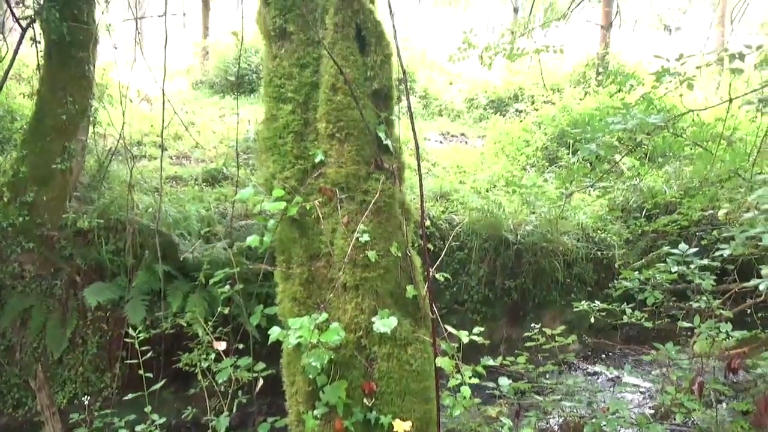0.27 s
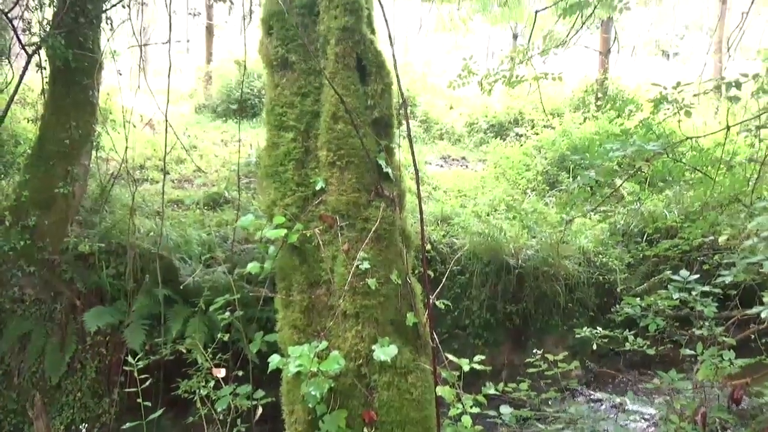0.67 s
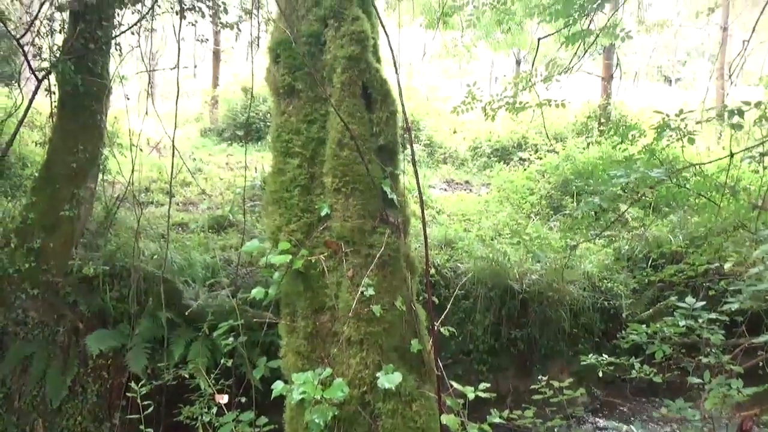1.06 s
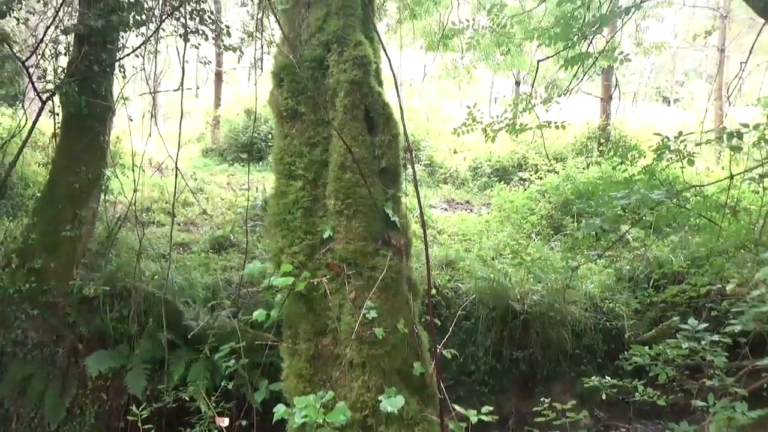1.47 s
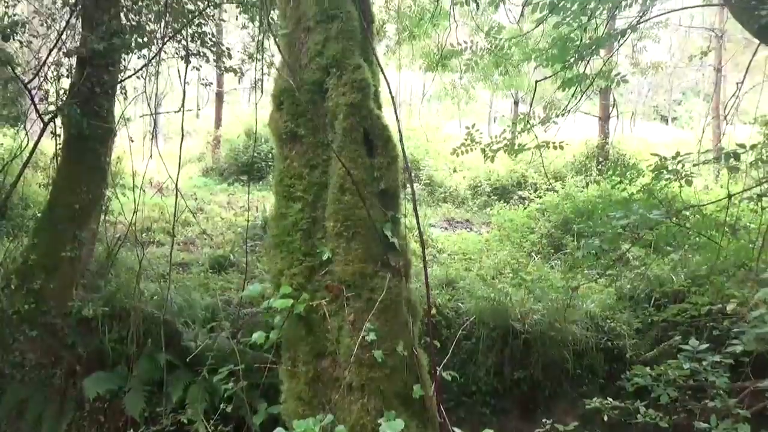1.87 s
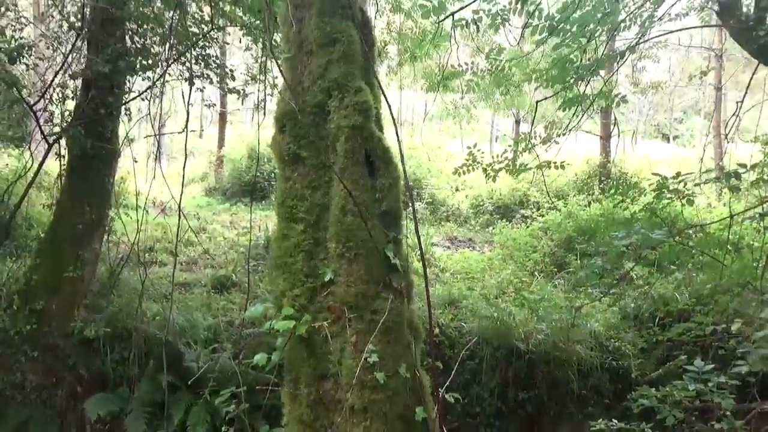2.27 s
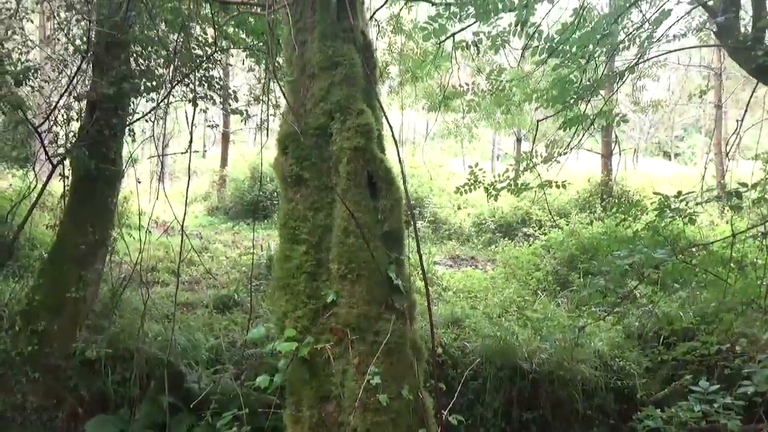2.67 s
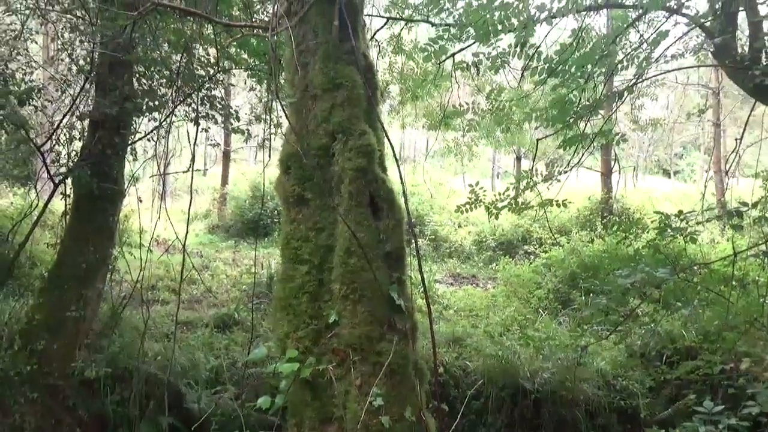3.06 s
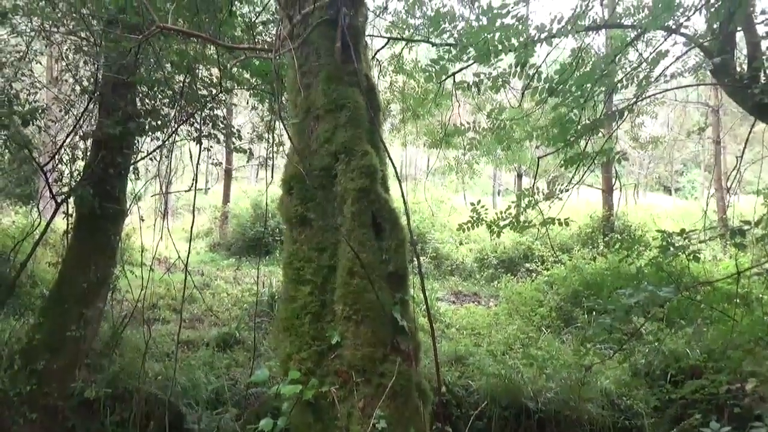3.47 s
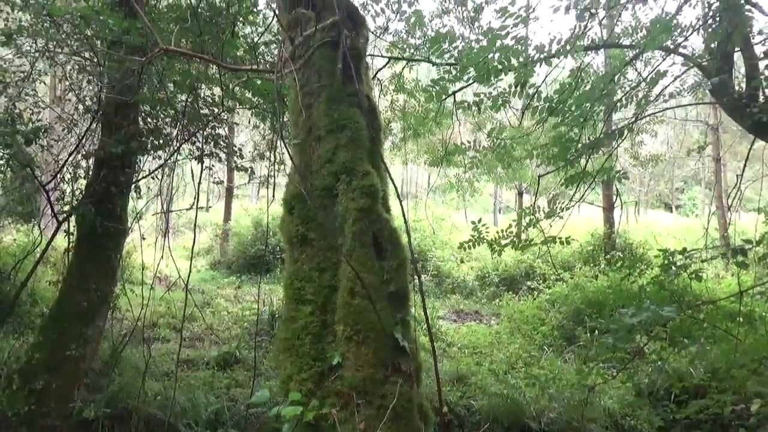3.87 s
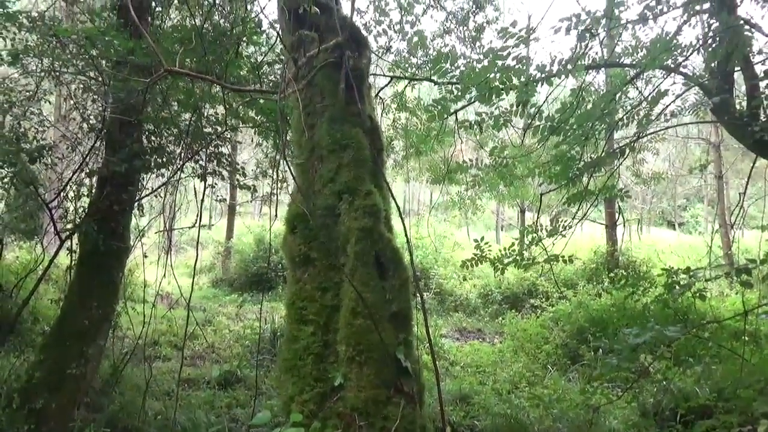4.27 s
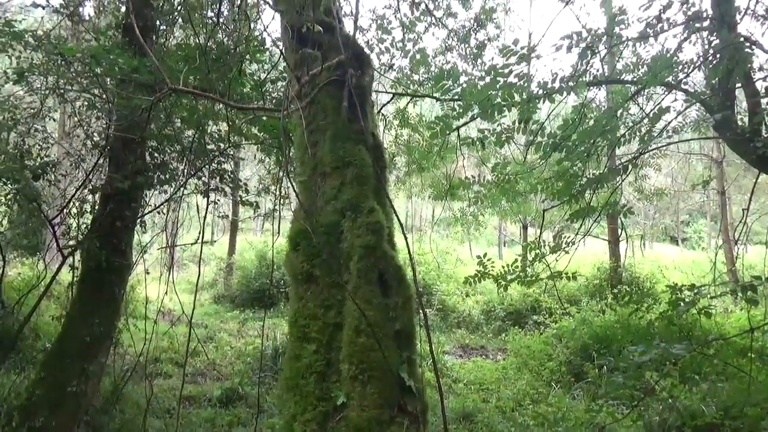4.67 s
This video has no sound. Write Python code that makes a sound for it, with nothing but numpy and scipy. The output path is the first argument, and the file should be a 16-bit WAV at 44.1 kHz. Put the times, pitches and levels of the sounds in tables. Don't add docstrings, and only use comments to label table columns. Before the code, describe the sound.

A dull handling knock opens, then a shallow stream runs continuously over stones: a bright, even wash filled with small bubbles, hollow glugs, rising plinks and crisp drop ticks. Thin high birds chirp faintly among the trees, mostly in the first two seconds. A very low distant engine hums underneath. The handheld stereo microphone is near the water, with a few faint finger touches.

```python
import sys
import numpy as np
from scipy import signal
from scipy.io import wavfile
from scipy.ndimage import uniform_filter1d

SR = 44100
rng = np.random.default_rng(int(sys.argv[2]) if len(sys.argv) > 2 else 0)


def gain_from_db(level_db):
    decades = np.asarray(level_db, float) / 20
    return 10 ** decades


def pcm_store(signal):
    levels = np.round(np.clip(np.atleast_2d(signal), -1, 1) * 32767)
    wavfile.write(sys.argv[1], SR, levels.astype(np.int16).T)


N = 212948

# (time [s], peak level [dB], pitch [Hz])
NEAR_DROPS = [(0.1505, -25, 8740), (0.4633, -28, 7250), (1.019, -25, 7700), (1.2216, -27, 7250),
              (1.2994, -22.5, 6700), (3.9439, -26, 9700), (1.434, -28, 7700), (1.976, -25, 7000),
              (2.127, -21, 8000), (2.162, -21, 8140), (2.3283, -25, 7010), (2.351, -25, 8170),
              (2.4195, -26, 7260), (2.5124, -23, 8600), (2.5701, -27, 7900), (2.6256, -25, 7200),
              (3.051, -27, 8220), (3.1232, -20, 8700), (3.1453, -22, 10000), (3.332, -23, 7300),
              (3.673, -23.5, 10700), (3.737, -19, 9600), (3.863, -20.5, 10100), (4.155, -25, 9000),
              (4.186, -19, 10700), (4.2677, -23, 7200), (4.6028, -23, 7800), (4.7045, -29, 7400),
              (4.7361, -23, 9400), (4.775, -24, 9040)]


def rms_one(x):
    return x / np.sqrt(np.mean(x ** 2) + 1e-20)


def in_time(rows):
    s, *columns = np.transpose(rows)
    return [np.interp(np.arange(N) / SR, s, column) for column in columns]


def at_hz(points, hz):
    point_hz, value = np.transpose(points)
    return np.interp(np.log(hz), np.log(point_hz), value)


def drift(rate_hz):
    pole = np.exp(-80 * np.pi * rate_hz / SR)
    noise = rng.standard_normal(N // 40 + 2002)
    slow = signal.lfilter([1], [1, -2 * pole, pole * pole], noise)[2000:]
    return np.interp(np.arange(N) / 40, np.arange(len(slow)), rms_one(slow))


def place(shapes, s, pan_db):
    starts = np.round(s * SR).astype(int)
    at = (starts[:, None] + np.arange(shapes.shape[1])).ravel()
    sides = []
    for sign in (1, -1):
        panned = shapes * gain_from_db(sign * pan_db / 2)[:, None]
        sides.append(np.bincount(at, panned.ravel(), N)[:N])
    return np.array(sides)


def pings(s, db, hz, t60, rise, pan_db, size=2000, swell_cycles=4.2):
    t = np.arange(size) / SR
    db, hz, t60, rise = [v[:, None] for v in (db, hz, t60, rise)]
    swell = 1 - np.exp(-t * hz / swell_cycles)
    phase = 2 * np.pi * hz * (t + rise * t ** 2 / (2 * t60))
    fade = np.clip((size / SR - t) * 200, 0, 1)
    return place(gain_from_db(db - 60 * t / t60) * swell * fade * np.sin(phase), s, pan_db)


def scatter(x, t60, build_s, spread):
    t = np.arange(20000) / SR
    shared, left, right = rng.standard_normal((3, len(t)))
    envelope = gain_from_db(-60 * t / t60) * (1 - np.exp(-t / build_s))
    tail = (shared + spread * np.array([left, right])) * envelope
    tail /= np.sqrt(np.mean(np.sum(tail ** 2, axis=1)))
    return signal.fftconvolve(x[None], tail, axes=1)[:, :N]


def engine():
    # (time [s], pitch [Hz], level [dB rms])
    drone = [(0.0, 59.5, -67.5), (0.6, 57.1, -71), (2.45, 59.9, -60.5), (2.94, 63.4, -62.5),
             (4.42, 65, -61.5), (4.83, 62, -63.5)]
    hz, db = in_time(drone)
    phase = 2 * np.pi * np.cumsum(hz + 0.59 * drift(3.0)) / SR
    lag = 0.15 * drift(6.7) * np.array([[1], [-1]])
    return gain_from_db(db + 4.0 + 1.2 * drift(2.5)) * np.sin(phase + lag)


def glides(rows, waver_size, flutter_db):
    out = np.zeros(N)
    for s, length_s, first_hz, last_hz, db, waver_hz in rows:
        u = np.arange(int(length_s * SR)) / (length_s * SR)
        slow = uniform_filter1d(rng.standard_normal((2, 6000)), size=waver_size)
        waver, flutter = rms_one(slow)[:, :len(u)]
        hz = first_hz + (last_hz - first_hz) * u + waver_hz * waver
        shape = gain_from_db(flutter_db * flutter) * np.sin(np.pi * u) ** .5
        note = gain_from_db(db + 2.5) * rms_one(shape) * np.sin(2 * np.pi * np.cumsum(hz) / SR)
        out[int(s * SR):][:len(u)] += note
    return out


def birds():
    # (time [s], length [s], first pitch [Hz], last pitch [Hz], level [dB rms])
    seeps = [(0.179, 0.023, 8250, 7580, -47.5), (0.342, 0.04, 7000, 7670, -50),
             (0.738, 0.034, 6450, 7630, -50), (0.767, 0.03, 8500, 8600, -45),
             (0.799, .045, 8650, 8400, -47), (.835, 0.061, 8270, 8000, -45), (1.664, .015, 7300, 7900, -49),
             (1.703, 0.016, 8200, 7600, -50), (1.779, 0.025, 6800, 6120, -43),
             (1.944, 0.015, 6500, 5970, -48), (2.418, 0.02, 7300, 7100, -51),
             (4.267, 0.028, 7100, 7300, -50), (1.575, 0.018, 7000, 7300, -50),
             (1.425, 0.016, 7600, 6530, -52), (4.455, 0.015, 6300, 6700, -52)]
    # (time [s], length [s], first pitch [Hz], last pitch [Hz], level [dB rms])
    whistles = [(0.025, 0.02, 6400, 7500, -45.5), (0.04, 0.025, 7480, 7400, -48),
                (0.243, 0.044, 6180, 6460, -49.5), (0.307, 0.062, 6250, 6400, -53),
                (0.595, 0.021, 6280, 6410, -44.5), (.765, 0.039, 7300, 7500, -48),
                (0.911, 0.023, 8150, 8100, -48), (0.96, .015, 8100, 8050, -51), (.72, .04, 6200, 6300, -58),
                (0.983, 0.018, 7300, 7030, -45), (1.178, 0.042, 6940, 7120, -45),
                (1.385, 0.042, 7900, 8220, -52), (2.774, 0.038, 9200, 8500, -52),
                (2.83, 0.038, 8600, 8600, -46.5), (2.92, .05, 8450, 8450, -55),
                (2.92, .045, 7750, 7650, -55), (2.82, 0.07, 8200, 8050, -50),
                (2.881, 0.034, 8030, 7820, -49), (3.861, .09, 6830, 6560, -57),
                (3.996, 0.042, 6900, 6530, -56), (4.045, 0.085, 6530, 6450, -52)]
    # (time [s], length [s], pitch [Hz], level [dB rms])
    chips = [(.075, 0.015, 4780, -52), (1.041, 0.028, 5600, -53), (1.86, 0.019, 4620, -51),
             (1.976, .03, 5030, -56), (2.345, 0.022, 4820, -52), (3.984, .015, 6100, -54),
             (4.255, .03, 5500, -59), (4.288, 0.034, 5550, -47), (4.355, .022, 5130, -57),
             (4.295, 0.03, 4620, -59), (4.318, 0.016, 5140, -47), (4.365, 0.03, 5540, -57)]
    seep_waver_hz, whistle_waver_hz, chip_waver_hz, chip_sag_hz = 250, 70, 35, 40
    wood_t60_s = 0.56

    high = [(*note, seep_waver_hz) for note in seeps]
    high += [(*note, whistle_waver_hz) for note in whistles]
    low = [(s, length_s, hz, hz - chip_sag_hz, db, chip_waver_hz) for s, length_s, hz, db in chips]
    voice = glides(high, waver_size=70, flutter_db=4.5) + glides(low, waver_size=120, flutter_db=3.0)
    return gain_from_db(4.5) * voice + gain_from_db(2.0) * scatter(voice, wood_t60_s, build_s=0.0033, spread=0.28)


def bumps():
    # (time [s], peak level [dB], pitch [Hz], t60 [s])
    knocks = [
        (0.043, -28.5, 250, 0.033),
        (.805, -42, 242, 0.033),
        (1.289, -39.5, 273, 0.031),
        (.27, -45, 287, .04),
        (4.3, -45, 326, 0.063),
    ]
    s, db, hz, t60 = np.transpose(knocks)
    return pings(s, db + 8.5, hz, t60, 0 * s, 0 * s, size=3000, swell_cycles=0.84)


def wash(babble_db, spray_db):
    # (frequency [Hz], density [dB per Hz])
    wash_spectrum = [(20, -23), (40, -9), (107, -4), (280, -0.5), (430, -9.5), (620, -4.5), (1230, -1.5),
                     (2050, -1.5), (3320, -6.5), (5120, -7.5), (6500, -7), (8000, 1), (10200, -5.5),
                     (14000, -7)]
    # (frequency [Hz], left-right likeness [0-1])
    likeness = [(60, 1), (140, 1), (350, 0.77), (830, 0.92), (2000, 1), (4800, 0.92), (11500, 0.9)]
    surge_sizes_db = [(150, 0.062), (1000, 1.8), (8000, 1.6)]

    out, together = 0, drift(7)
    band_hz = 25 * 2 ** np.arange(0, 9.3, .4)
    white = rng.standard_normal((2, 2, N))
    for k, (low, high) in enumerate(zip(band_hz, band_hz[1:])):
        band = signal.butter(2, [low, high], "band", fs=SR, output="sos")
        mid, side = signal.sosfilt(band, white[k % 2])
        hz = np.sqrt(low * high)
        alike = np.clip(at_hz(likeness, hz) - .03, 0, .995)
        surge_db = at_hz(surge_sizes_db, hz) * (0.29 * together + drift(24.3))
        follows = np.interp(np.log(hz / 1000), [-1.2, -.7], [0, 1])
        flow_db = follows * (babble_db if hz < 4500 else spray_db)
        stereo = np.sqrt(1 + alike) * mid + np.sqrt(1 - alike) * side * [[1], [-1]]
        out = out + gain_from_db(at_hz(wash_spectrum, hz) + surge_db + flow_db) * stereo
    return gain_from_db(-40) * rms_one(out)


def spray(flow_db):
    # (time [s], half length [s], lift [dB])
    slops = [(.15, .05, 1.5), (0.582, .03, 9), (.78, .03, 1), (1.365, .02, 4.5), (1.55, 0.034, 5),
             (2.1, 0.33, 2.5), (2.63, .03, 1.5), (2.9, .015, 3), (3.12, .03, 2), (3.22, .015, 1),
             (3.33, .04, 2), (3.87, 0.028, 4), (4.17, 0.025, 2), (4.306, 0.032, 7), (4.763, .04, 2.5)]
    follows_flow, gust_db, gusts_hz = .3, 0.5, 12.0
    splash_db, splash_s = 1, 0.017

    t = np.arange(0, N, 40) / SR
    drop_s = np.array(NEAR_DROPS)[:, :1]
    s, half_s, lift_db = np.transpose(slops)[:, :, None]
    splash = splash_db * np.exp(-((t - drop_s) / splash_s) ** 2).max(axis=0)
    splash = splash + (lift_db * np.exp(-((t - s) / half_s) ** 2)).sum(axis=0)
    gusts = gust_db * drift(gusts_hz)
    total_db = follows_flow * flow_db + gusts + np.interp(np.arange(N) / SR, t, splash)
    return total_db - total_db.mean()


def spits(s, db, hz, t60, pan_db, count=4):
    late, spread = rng.random((2, len(s), count)) * (np.arange(count) > 0)
    s = s[:, None] + .005 * late
    hz = hz[:, None] * (1 + 0.3 * spread * (-1) ** np.arange(count))
    late = late.ravel()
    db, t60, pan_db = [np.repeat(v, count) for v in (db, t60, pan_db)]
    db = db - 6 * late - 4 * (late > 0)
    return pings(s.ravel(), db + 5, hz.ravel(), t60, 0 * db, pan_db, size=400, swell_cycles=0.56)


def ticks():
    # (time [s], peak level [dB], pitch [Hz])
    spray_ticks = [(0.2508, -28, 7110), (0.5267, -27, 7560), (0.5686, -28, 10300), (0.602, -25, 6440),
                   (0.7662, -23, 7410), (0.7871, -23, 8080), (0.8949, -23, 8140), (0.9622, -25, 8080),
                   (1.0114, -26, 7760), (1.1179, -27, 7780), (1.1662, -27, 6940), (1.2675, -23, 7080),
                   (1.3588, -27, 9230), (1.3714, -27, 9900), (1.3814, -27, 8060), (1.5224, -31, 7510),
                   (1.5424, -29, 9130), (1.5574, -25, 10500), (1.5724, -29, 7000), (1.5934, -27, 7100),
                   (1.8123, -25, 6340), (1.9374, -26, 5990), (2.0028, -29, 7450), (2.0462, -26, 7830),
                   (2.3256, -29, 10200), (2.4962, -27, 7810), (2.6544, -31, 9360), (2.7317, -27, 9600),
                   (2.7611, -32, 9810), (2.8174, -24, 8130), (2.8928, -26, 7840), (2.9594, -31, 9520),
                   (3.3004, -29, 7540), (3.8734, -28, 6480), (4.0218, -31, 6740), (4.0574, -30, 6470),
                   (4.1121, -28, 6890), (4.1754, -25, 10300), (4.2124, -32, 8280), (4.3954, -26, 8770),
                   (4.4984, -27, 10700), (4.6912, -31, 8050)]
    # (time [s], peak level [dB], pitch [Hz])
    pips = [(0.0757, -36, 2780), (0.1173, -36, 2370), (0.1444, -30.5, 3030), (0.213, -33, 2820),
            (0.3242, -32, 3170), (0.5272, -31, 2680), (0.6085, -36, 3140), (0.622, -34, 2780),
            (0.6664, -36, 2720), (0.7462, -35, 2460), (0.8894, -36, 2990), (0.9093, -35, 3800),
            (1.0497, -34, 3710), (1.074, -30.5, 2760), (1.2575, -36, 3590), (1.283, -31, 3380),
            (1.3099, -37, 2470), (1.4012, -36, 2510), (1.4965, -31, 2270), (1.701, -33, 2540),
            (1.8692, -34, 2330), (2.1056, -35, 2570), (2.3131, -32, 4060), (2.4713, -36, 2770),
            (2.6244, -32, 3720), (2.6534, -36, 2380), (2.6873, -36, 2370), (2.7197, -36, 2430),
            (2.738, -33, 2450), (2.8055, -35, 2920), (2.8968, -35, 2590), (2.9677, -37, 3350),
            (2.9926, -34, 3170), (3.0594, -39, 2480), (3.1128, -35, 3820), (3.1288, -34, 2300),
            (3.2131, -34, 3750), (3.2979, -30, 2780), (3.3682, -35, 2280), (3.3977, -38, 2530),
            (3.5952, -36, 2360), (3.702, -36, 2910), (3.8676, -38, 2300), (3.8676, -32, 2770),
            (3.903, -38, 2360), (3.9549, -39, 2660), (4.1111, -33, 2700), (4.1834, -34, 3430),
            (4.3206, -37, 2450), (4.3395, -37, 2340), (4.3884, -31.5, 3800), (4.4458, -35, 2810),
            (4.4852, -35, 3400), (4.5201, -32, 3850), (4.6653, -34, 2340), (4.7027, -34, 2300)]
    s, db, hz = np.transpose(spray_ticks)
    out = spits(s, db - 4, hz, 22 / hz, 0 * s, count=3)
    s, db, hz = np.transpose(pips)
    climb, side = rng.random((len(s), 2)).T
    pan_db = 5 * (side - .5)
    return out + pings(s - .001, db, hz, 55 / hz, .12 * climb, pan_db, size=1200, swell_cycles=1.5)


def droplets(spray_db, count=900):
    # (frequency [Hz], gain [dB])
    mic_colour = [(3000, -14), (5200, -1), (7000, 1), (11000, 9.5)]
    s, pitch, life, side, size = rng.random((count, 5)).T
    hz = 3000 * 3.9 ** (pitch ** .5)
    db = -43 - 2.2 * np.log(size + 0.15) + at_hz(mic_colour, hz)
    db = db + 0.5 * spray_db[(s * N).astype(int)]
    far = spits(s * N / SR, db, hz, (12 + 40 * life) / hz, 8 * (side - .5))

    s, db, hz = np.transpose(NEAR_DROPS)
    near = spits(s, db - 5.5, hz, 32 / hz, 0 * s)
    slap = pings(s, db - 11, hz / 3.6, 25 / hz, 0 * s, 0 * s, size=400, swell_cycles=0.5)
    return far + near + slap


def babble(babble_db, count=4700):
    # (pitch [Hz], level [dB])
    bubble_levels = [(250, -19.5), (560, -12), (1200, -2), (2200, 0), (4500, -1.5)]
    s, pitch, life, climb, side, size = rng.random((count, 6)).T
    hz = 300 * 15 ** pitch
    db = -40.3 + at_hz(bubble_levels, hz) - 1.5 * np.log(size + 0.12)
    db = db + 2.3 * babble_db[(s * N).astype(int)]
    t60 = (14 + 55 * life ** 2) / hz
    return pings(s * N / SR, db, hz, t60, 0.31 * climb, 9 * (side - .5), size=1200, swell_cycles=0.58)


def gurgles(count=7):
    # (time [s], length [s], first pitch [Hz], last pitch [Hz], level [dB])
    pockets = [(.0, 0.025, 776, 800, -41.5), (0.8, .025, 1460, 1500, -41), (5, .04, 1260, 1210, -43.5),
               (1.06, 0.068, 1130, 776, -44), (0.76, 0.05, 800, 860, -47), (.915, .06, 1500, 900, -43),
               (1.7, 0.035, 2010, 1170, -41), (1, 0.048, 1074, 840, -43.5), (2.607, 0.088, 1290, 1260, -48),
               (0.8, 0.075, 1610, 1700, -41), (0.8, 0.05, 870, 1080, -50), (4.025, .025, 1330, 1500, -41),
               (.60, .05, 1750, 1480, -46), (2.5, 0.048, 2050, 2690, -42), (3, .11, 810, 900, -48),
               (3.5, .04, 540, 580, -49), (2.5, .04, 950, 820, -51), (3.5, 0.062, 560, 573, -57),
               (1.9, .05, 526, 640, -51), (2, .04, 600, 830, -47), (1.78, .025, 1400, 1490, -43.5),
               (3.5, .1, 1500, 1900, -42), (3.5, 0.057, 1320, 1590, -39), (4, 0.074, 1530, 2220, -40.5),
               (4, 0.038, 1790, 2550, -43)]
    s, length_s, first_hz, last_hz, db = np.transpose(pockets)[:, :, None]
    jitter, detune, size, climb = rng.random((len(s), 4, count)).transpose(1, 0, 2)
    u = (np.arange(count) + jitter) / count
    hz = (first_hz + (last_hz - first_hz) * u) * (1 + 0.082 * (detune - .5))
    hz = hz.ravel()
    db = (db + 1.5 + 6 * (size - .5)).ravel()
    s = (s + length_s * u).ravel()
    return pings(s, db, hz, 60 / hz, 0.13 * climb.ravel(), 0 * hz, swell_cycles=0.39)


def glugs():
    # (time [s], peak level [dB], pitch [Hz])
    single_bubbles = [(0.21, -21, 1210), (0.274, -28, 1030), (0.712, -24, 1056), (0.746, -23, 800), (0.787, -29, 900),
                      (0.916, -24, 1270), (0.947, -26, 996), (1.116, -33, 905), (1.257, -35, 875), (1.316, -24, 1057),
                      (1.699, -23, 1275), (2.002, -29, 1220), (2.042, -27, 1130), (2.336, -29, 1226),
                      (2.375, -26, 1030), (2.439, -29, 1170), (2.674, -27, 1070), (2.982, -23, 1007),
                      (3.128, -26.5, 887), (3.277, -26, 1250), (3.298, -26, 980), (3.344, -27, 890),
                      (3.398, -27, 1240), (3.884, -19, 1256), (4.101, -24.5, 1120), (4.244, -31, 1197),
                      (4.319, -30, 1216), (4.341, -24, 1180), (4.617, -25, 970), (4.779, -23, 1007),
                      (0.405, -22.5, 1470), (0.581, -24, 2020), (0.609, -26, 1670), (0.68, -19, 1544),
              (1.05, -22, 1834), (.64, -27, 1480), (1.497, -23, 2420), (1.635, -34, 1310),
              (1.748, -29, 1960), (1.862, -25, 1355), (1.944, -23, 1566), (2.182, -30, 1950),
              (2.229, -32, 2110), (2.358, -25.5, 1815), (2.59, -27, 2220), (2.653, -24, 1360),
              (2.72, -25, 1450), (2.738, -32, 2460), (2.893, -26, 1480), (2.967, -31, 3260),
              (3.094, -27, 1394), (3.246, -27, 1910), (3.32, -28, 1890), (3.368, -28, 2254),
              (3.595, -25, 2090), (3.792, -31, 1410), (3.834, -24, 2120), (3.86, -28, 2110),
              (4.024, -24, 1340), (4.526, -32, 1510),
                      (0.04, -23.5, 576), (0.086, -31, 483), (0.32, -40, 706), (0.74, -27, 775), (0.874, -32, 558),
              (1.074, -29.5, 680), (1.216, -33, 570), (1.265, -32, 566), (1.609, -34, 720),
              (2.132, -26.5, 542), (2.374, -33, 790), (2.842, -39, 570), (2.956, -31.5, 513),
              (3.441, -36, 894), (3.638, -28, 814), (3.736, -37, 776), (3.707, -26, 1286),
              (3.954, -30, 820), (.33, -28, 1640), (.795, -28, 1800), (3.042, -30, 1740), (2.62, -27, 1250),
              (3.365, -29, 1150), (1.525, -27, 1110), (1.915, -34, 900), (2.012, -30, 884),
              (4.109, -34, 847), (4.179, -30.5, 530), (4.465, -31.5, 780)]
    # (time [s], peak level [dB], pitch [Hz])
    trickle = [(0.1166, -36, 2380), (0.2304, -32, 1940), (1.4606, -36, 2200), (1.6511, -37, 1990),
               (1.9121, -33, 1540), (1.9864, -36, 1640), (2.3271, -35, 2100), (2.4394, -35, 2030),
               (2.5566, -40, 2200), (2.6044, -35, 1920), (2.6514, -36, 2400), (2.6898, -29, 2230),
               (2.7074, -35, 2220), (2.8335, -37, 2230), (3.1283, -33, 1670), (3.1542, -37, 1930),
               (3.1991, -33, 1590), (3.3444, -35, 2480), (3.4231, -35, 2020), (3.4925, -35, 1900),
               (3.6094, -33, 2040), (3.8664, -34, 2130), (3.9724, -38, 2080), (4.3186, -37, 1960),
               (4.3715, -36, 1850), (4.4094, -34, 2100), (4.7032, -33, 2170)]
    ring_t60_s, pitch_power, loss_per_db = .062, 0.56, .004
    swell_lead_s = 0.001995

    louder_trickle = [(s, db + 3.5, hz) for s, db, hz in trickle]
    s, db, hz = np.transpose(single_bubbles + louder_trickle)
    s = s - swell_lead_s
    climb, side, *trail = rng.random((len(s), 6)).T
    t60 = ring_t60_s * (1000 / hz) ** pitch_power * np.exp(-loss_per_db * (db + 27.0))
    t60 = np.clip(t60, .01, .2)
    out = pings(s, db - 7.2, hz, 0.85 * t60, 0.21 * climb, 4 * (side - .5), size=3000, swell_cycles=2.0)
    for late, pitch in (trail[:2], trail[2:]):
        trail_s = s + 0.00389 + 0.039 * late
        trail_hz = hz * (.75 + .6 * pitch)
        out += pings(trail_s, db - 11.0, trail_hz, 0.34 * t60, 0.16 * climb, 6 * (late - .5))
    out += gurgles()
    return out + gain_from_db(-6.0) * scatter(out.mean(axis=0), t60=0.19, build_s=0.0063, spread=0.42)


def scene():
    # (time [s], level [dB])
    vigour = [(0.0, -43), (1.12, -43), (1.25, -44.5), (1.3, -43), (1.44, -45), (1.53, -43), (2.41, -43.5),
              (2.53, -44.5), (2.72, -41.5), (2.79, -45), (3.27, -42), (3.52, -45.5), (3.76, -44.5),
              (3.87, -42), (3.98, -45.5), (4.3, -42.5), (4.55, -44.5), (4.83, -43)]
    left_db = 0.44
    flow_db, = in_time(vigour)
    flow_db = flow_db - flow_db.mean()
    spray_db = spray(flow_db)
    water = wash(0.45 * flow_db, 0.49 * spray_db) + babble(0.4 * flow_db)
    water = water + glugs() + droplets(spray_db) + ticks()
    return (water + birds() + engine() + bumps()) * gain_from_db(np.array([[left_db], [-left_db]]))


def low_pass(x):
    return signal.sosfilt(signal.butter(12, 12130, fs=SR, output="sos"), x)


def record(dry):
    top_hz = 11030
    cut = signal.ellip(14, .3, 55, top_hz, fs=SR, output="sos")
    return low_pass(signal.sosfilt(cut, dry))


dry = scene()
out = record(dry)
pcm_store(out)
```